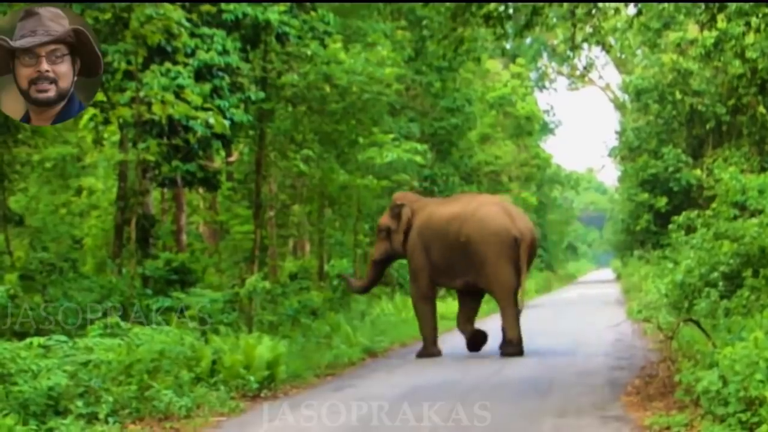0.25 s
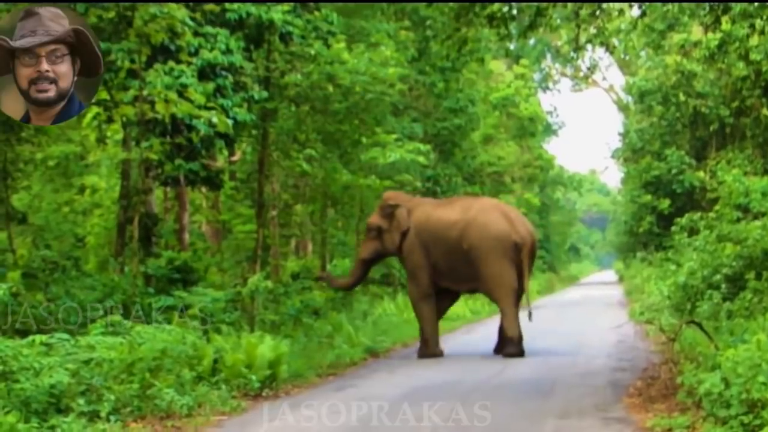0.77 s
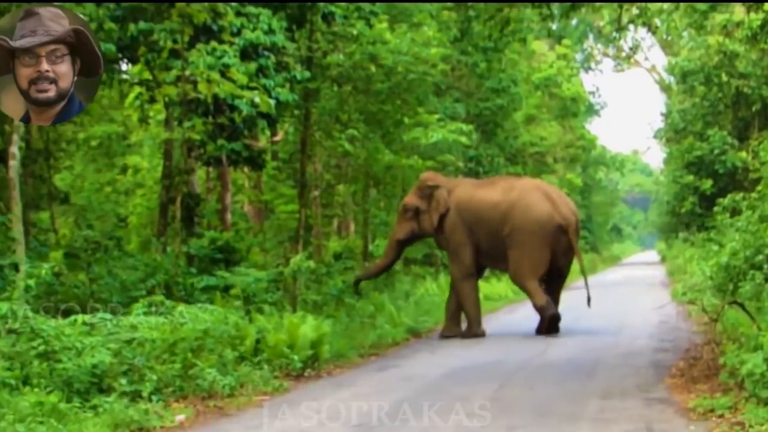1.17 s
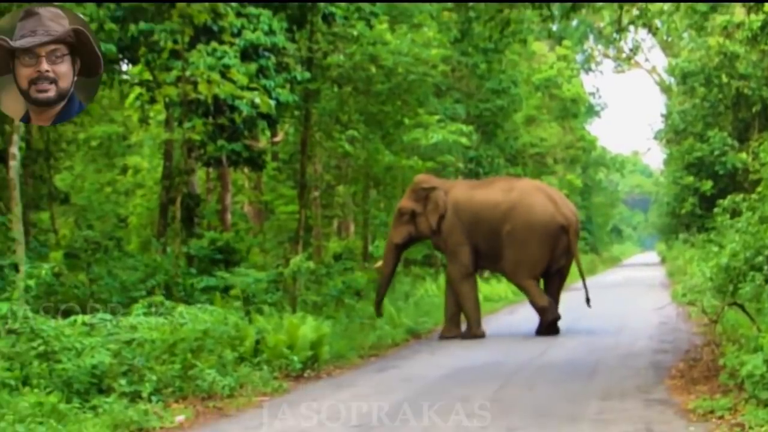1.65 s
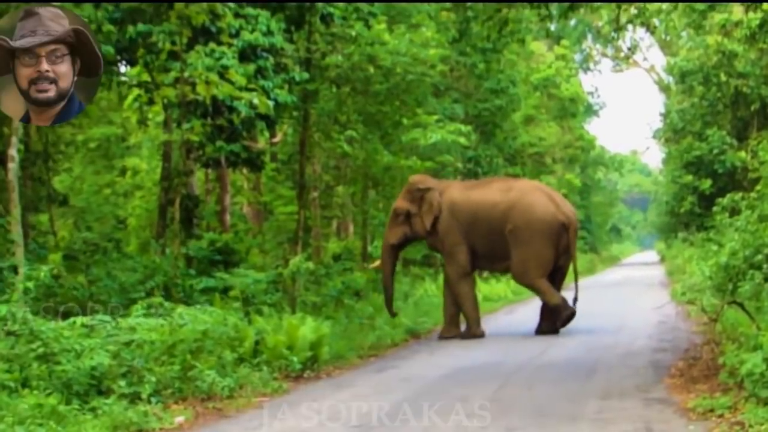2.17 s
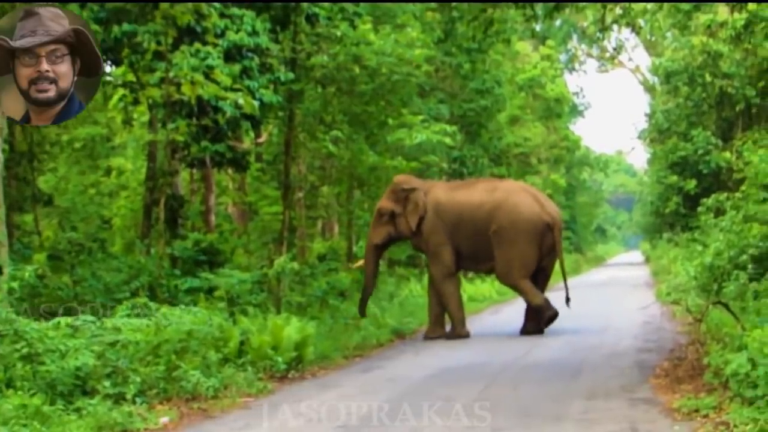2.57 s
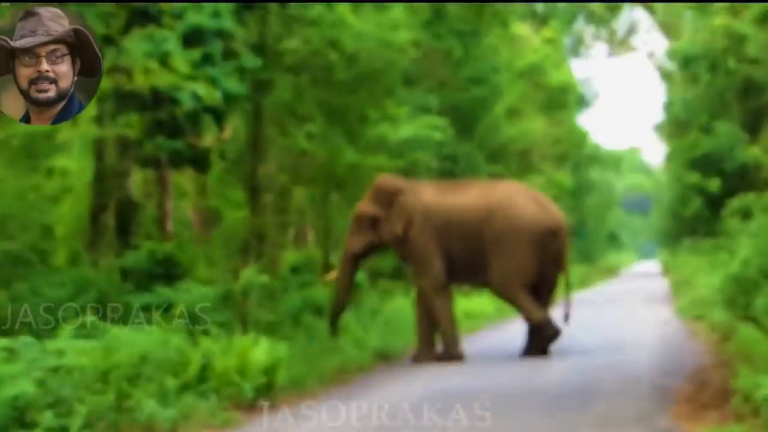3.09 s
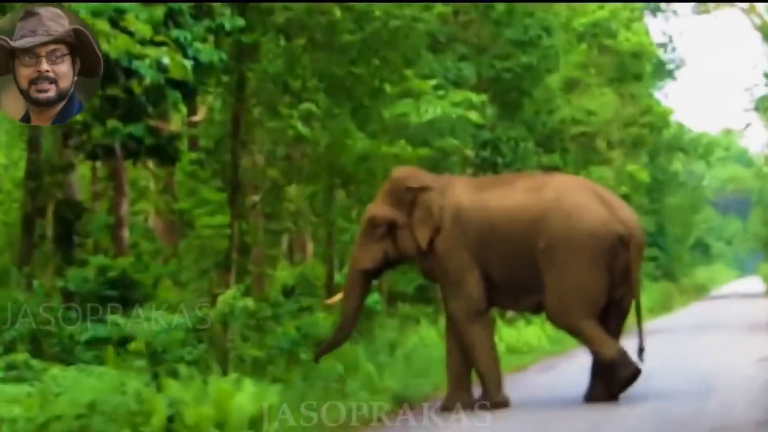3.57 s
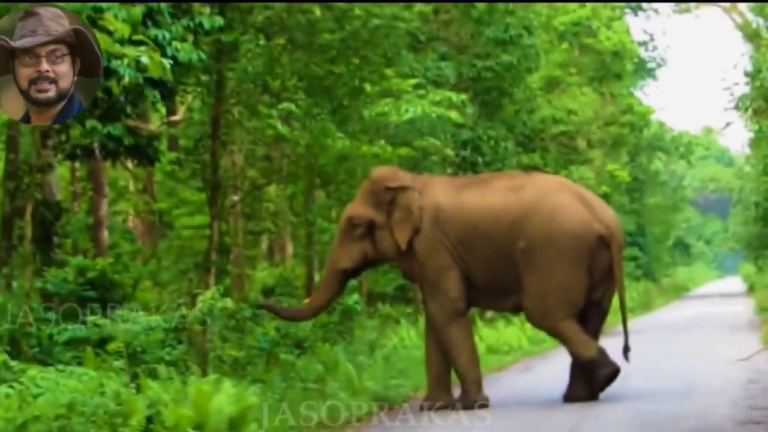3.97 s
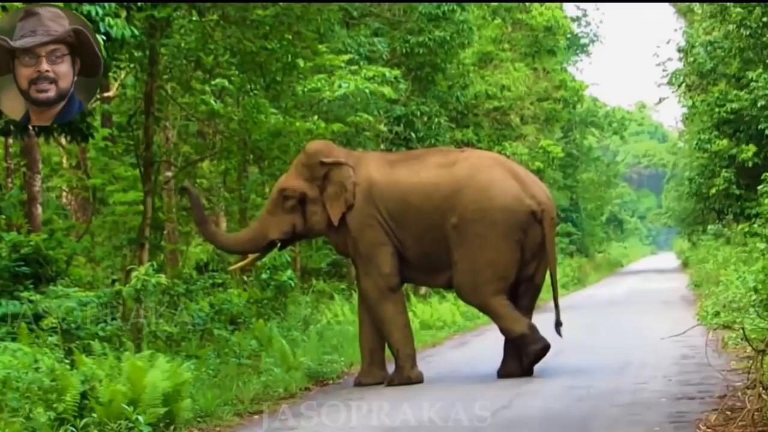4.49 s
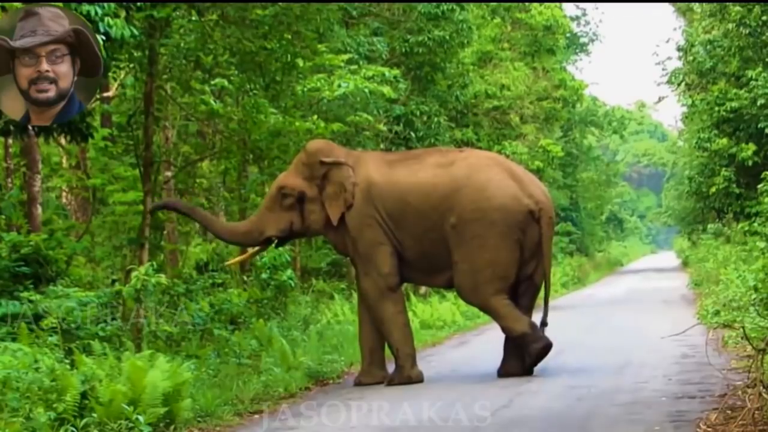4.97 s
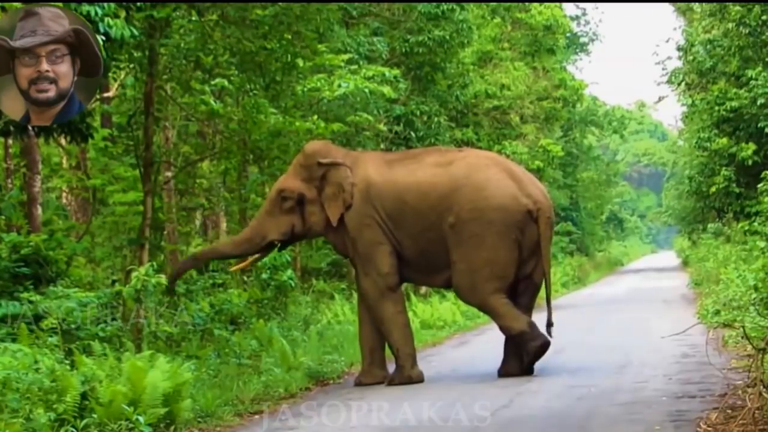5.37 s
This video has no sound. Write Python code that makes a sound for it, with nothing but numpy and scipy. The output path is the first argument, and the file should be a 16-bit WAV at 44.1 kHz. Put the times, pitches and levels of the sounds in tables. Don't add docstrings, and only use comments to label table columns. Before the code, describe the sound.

A daytime forest road in stereo, with low, uneven wind rumble, faint leaf hiss and crisp drops ticking on leaves throughout. Far birds whistle and chatter from the start. At about 0.8 s a near bird gives a rounded, harmonic squeal, rising quickly then falling until about 1.2 s. Small chips from slightly left grow into full falling chips alternating with rough burrs from 1.65 to 2.9 s, over a distant sagging trill at 1.5-2.5 s. Thin high notes flicker above. Clear trembling whistles hold, fall and arch between 3.2 and 3.9 s. Around 4.05 s a brighter squeal overlaps a two-humped whistle, with a flare of far chatter. From about 4.5 s a low engine idle fades in quickly and stays soft. Gusts shake leaves at 4.6 and most strongly at 5.3 s, among low gulps at 4.9-5.1 s and quick twitters. Trees return a short, diffuse echo.

```python
import sys
import numpy as np
from scipy import signal
from scipy.io import wavfile
from scipy.ndimage import uniform_filter1d

SR = 44100
rng = np.random.default_rng(int(sys.argv[2]) if len(sys.argv) > 2 else 0)


def gain_from_decibels(decibels):
    exponent = np.asarray(decibels, float) / 20
    return 10 ** exponent


def wrap_up_sound(samples):
    columns = np.atleast_2d(samples).T
    tamed = np.clip(columns, -1, 1)
    steps = np.round(tamed * 32767).astype(np.int16)
    wavfile.write(sys.argv[1], SR, steps)


N = 248283


def in_time(rows):
    s, *columns = np.transpose(rows)
    return [np.interp(np.arange(N) / SR, s, c) for c in columns]


def at_hz(points, hz):
    table_hz, value = np.array(points)[:, 0], np.array(points)[:, 1]
    return np.interp(np.log(hz), np.log(table_hz), value)


def rms_one(x):
    return x / np.sqrt(np.mean(x ** 2) + 1e-20)


def drift(rate_hz):
    r = np.exp(-80 * np.pi * rate_hz / SR)
    slow = signal.lfilter([1], [1, -2 * r, r * r], rng.standard_normal(N // 40 + 2002))[2000:]
    return np.interp(np.arange(N) / 40, np.arange(len(slow)), rms_one(slow))


def band(x, low_hz, high_hz):
    return signal.sosfilt(signal.butter(2, [low_hz, high_hz], "band", fs=SR, output="sos"), x)


def pan(x, left_db):
    return x * gain_from_decibels(np.array([[left_db / 2], [-left_db / 2]]))


def breaks(rows):
    t = np.arange(N) / SR
    return sum(db * np.exp(-((t - s) / width_s) ** 2) for s, width_s, db in rows)


def flares(rows, floor_db):
    t = np.arange(N) / SR
    peaks = [db - np.where(t < s, rise * (s - t), fall * (t - s)) for s, db, rise, fall in rows]
    return np.max(peaks + [t * 0 + floor_db], axis=0)


def sounding(tables, fade_s):
    on = np.zeros(N)
    for rows in tables:
        on[round(rows[0][0] * SR):round(rows[-1][0] * SR)] = 1
    return uniform_filter1d(on, max(2, round(fade_s * SR)))


def shaped(rows, start, end):
    return [(s, length, start * hz, hz, end * hz, db) for s, length, hz, db in rows]


def straight(rows):
    return [(s, length, first, (first + last) / 2, last, db) for s, length, first, last, db in rows]


def notes(rows, swell, flutter_db, flutter_hz, wobble):
    out, shake = np.zeros(N), 1 + wobble * drift(flutter_hz)
    for s, length, first, middle, last, db in rows:
        u = np.arange(round(length * SR)) / (length * SR)
        at = round(s * SR) + np.arange(len(u))
        hz = first * (1 - u) * (1 - 2 * u) + 4 * middle * u * (1 - u) + last * u * (2 * u - 1)
        tone = np.sin(2 * np.pi * np.cumsum(hz * shake[at]) / SR)
        out[at] += gain_from_decibels(db) * np.sin(np.pi * u) ** swell * tone
    return out * gain_from_decibels(flutter_db * drift(flutter_hz))


def warbles(rows, per_s, sweep_hz, gate, flutter_db, rasp):
    out, shake = np.zeros(N), 1 + rasp * drift(250)
    for s, length, first, last, db in rows:
        t = np.arange(round(length * SR)) / SR
        at = round(s * SR) + np.arange(len(t))
        cycle = (t * per_s * rng.uniform(0.98, 1.08)) % 1
        hz = first + (last - first) * np.sqrt(t / length) + sweep_hz * (cycle - .5)
        shape = np.sin(np.pi * cycle) ** gate * np.sin(np.pi * t / length) ** 0.043
        out[at] += gain_from_decibels(db) * shape * np.sin(2 * np.pi * np.cumsum(hz * shake[at]) / SR)
    return out * gain_from_decibels(flutter_db * drift(32))


def banded_noise(spectrum, patchy_db):
    # hz, correlation
    likeness = [(25, 0.88), (90, 0.97), (180, 0.65), (350, 0.045), (700, 0.25), (1500, 0.55), (4000, 0.65),
                (12000, 0.079)]
    # hz, left_minus_right_db
    balance_db = [(30, -.8), (90, -1), (180, 2.5), (700, 0), (1500, -0.5), (12000, 0)]
    out, together = 0, drift(7.8)
    edges_hz = np.geomspace(18, 16500, 21)
    white = rng.standard_normal((2, 2, N))
    for k, (low, high) in enumerate(zip(edges_hz, edges_hz[1:])):
        hz = np.sqrt(low * high)
        if spectrum[0][0] < hz < spectrum[-1][0]:
            mid, side = band(white[k % 2], low, high)
            alike = np.clip(at_hz(likeness, hz), -1, 1)
            gain = gain_from_decibels(at_hz(spectrum, hz) + patchy_db * (1.02 * together + drift(13.5)))
            pair = np.sqrt(1 + alike) * mid + np.sqrt(1 - alike) * side * [[1], [-1]]
            out = out + pan(gain * pair, at_hz(balance_db, hz))
    return rms_one(out)


def wind():
    # s, rumble_db
    strength = [(0.0, -29), (.99, -28), (1.91, -32), (2.37, -30), (2.96, -33), (4.31, -36), (4.59, -31.5),
                (5.63, -31)]
    # hz, db_per_hz
    rumble = [(12, -38), (20, -3), (41, -0.5), (59, -2), (97, -6.5), (139, -5.5), (211, -15), (269, -11.5),
              (312, -19.5), (500, -26), (650, -27.5), (1100, -120)]
    # hz, db_per_hz
    leaves = [(180, -57), (300, -3), (508, -4.5), (583, -3.5), (695, -1.5), (904, -4.5), (2660, -7),
              (3920, -11), (6000, -13), (7800, -77), (13200, -120)]
    # hz, db_per_hz
    hiss = [(2060, -50), (3500, -10.5), (4010, -20), (4520, 4), (5980, -1), (6480, 6), (8370, -4.5),
            (13300, -4.5), (15500, -9)]
    # s, width_s, change_db
    lull = [(4.48, .1, -2.5)]
    wind_db, = in_time(strength)
    leaves_db = -40 + 0.16 * (wind_db - wind_db.mean())
    air = gain_from_decibels(wind_db) * banded_noise(rumble, patchy_db=1.0)
    air += gain_from_decibels(leaves_db) * banded_noise(leaves, patchy_db=.9)
    return air + gain_from_decibels(-45 + breaks(lull)) * banded_noise(hiss, patchy_db=1.3)


def hums():
    # hz, width_hz, level_db
    drones = [(510, 20, -61), (688, 25, -60.5), (822, 20, -61)]
    out = 0
    for hz, width_hz, db in drones:
        swell = gain_from_decibels(db + 2.5 * drift(1.5))
        out = out + swell * rms_one(band(rng.standard_normal((2, N)), hz - width_hz / 2, hz + width_hz / 2))
    return out


def engine():
    # s, firing_hz, level_db
    idle = [(0, 23.15, -116), (4.3, 23.35, -50.5), (4.58, 24.03, -37.5), (5.1, 23.92, -38.5),
            (5.63, 24, -39.5)]
    # multiple, level_db
    orders = [(1, -11), (2, -0.5), (3, 5), (4, -6), (5, -27), (7, -11)]
    hz, db = in_time(idle)
    phase = 2 * np.pi * np.cumsum(hz * (1 + 0.016 * drift(3.24))) / SR
    return sum(gain_from_decibels(db + order_db + 3.2 * drift(5)) * np.sin(round(k) * phase + k) for k, order_db in orders)


def gusts():
    # peak_s, peak_db, rise_db_per_s, fall_db_per_s
    leaf_gusts = [
        (4.63, -46, 300, 83),
        (4.96, -50.5, 40, 3),
        (5.28, -38, 128, 100),
    ]
    # peak_s, peak_db, rise_db_per_s, fall_db_per_s
    stir = [(4.95, -53, 40, 12), (5.3, -53, 20, 30)]
    still_db = -71
    leaf = rms_one(band(rng.standard_normal((2, N)), 2500, 9900))
    branch = rms_one(band(rng.standard_normal((2, N)), 750, 1200))
    return gain_from_decibels(flares(leaf_gusts, still_db) + 4.1 * drift(60)) * leaf + gain_from_decibels(flares(stir, still_db)) * branch


def drops():
    # s, peak_db
    large = [(0.07, -36), (0.336, -33), (0.414, -31), (0.471, -31), (.5447, -35), (.616, -36), (.7836, -33),
             (1.1034, -35), (1.5524, -36), (1.7335, -35), (2.8674, -33), (3.0121, -37), (3.1004, -36),
             (3.267, -34), (3.3403, -34), (3.3792, -33), (3.86, -36), (3.873, -36), (3.934, -32),
             (4.2682, -34), (4.4862, -37), (4.6279, -33), (4.9067, -36), (5.4949, -33), (5.5772, -35),
             (.6933, -36), (1.0081, -33), (1.1671, -34), (1.307, -37), (1.358, -32), (1.4012, -32),
             (1.4527, -32), (1.568, -34), (1.771, -31), (1.8951, -36), (2.2189, -35), (2.4803, -36),
             (2.5628, -32), (2.6555, -33), (2.722, -36.5), (2.818, -31), (3.121, -32.5), (3.2031, -33),
             (3.2281, -34), (3.52, -35), (3.6022, -39), (3.76, -41), (3.91, -37), (3.9889, -42),
             (4.9814, -37), (5.2465, -37)]
    s, peak_db = np.transpose(large)
    hits = (rng.random(N) < 16 / SR) * gain_from_decibels(-49 + 3.5 * rng.standard_normal(N))
    hits[np.round(s * SR).astype(int)] = gain_from_decibels(peak_db - 4.0)
    puff = signal.lfilter([1], [1, -np.exp(-1 / (.0045 * SR))], hits)
    noise = rng.standard_normal((2, N))
    leaf = signal.lfilter([1], [1, -.2], noise[0] + 0.1 * noise[1] * np.array([[1], [-1]]))
    return puff * rms_one(band(leaf, 3800, 10800))


def chatter():
    # peak_s, peak_db, rise_db_per_s, fall_db_per_s
    flare_ups = [
        (.3, -48.5, 32, 1),
        (.65, -42.5, 56, 33),
        (.85, -46, 27, 22),
        (4.1, -43, 123, 40),
        (4.89, -53, 100, 250),
    ]
    start, pitch, glide, size = rng.random((4, 1800))
    first = 1700 + 1900 * pitch
    last = first * (.8 + 0.404 * glide)
    start_s, length_s = start * (N / SR - .05), .005 + 0.0077 * size
    rows = np.transpose([start_s, length_s, first, (first + last) / 2, last, 5 * size])
    return gain_from_decibels(flares(flare_ups, -68)) * notes(rows, swell=0.4, flutter_db=2.0, flutter_hz=61, wobble=.01)


def far_birds():
    # start_s, length_s, first_hz, last_hz, level_db
    glides = [(0.0, 0.017, 2040, 2170, -37), (.032, 0.15, 2396, 2875, -41.5),
              (.132, 0.037, 1350, 1400, -49), (.15, .055, 2520, 2430, -49), (.18, .035, 2850, 3000, -49),
              (.25, .03, 1780, 1920, -48), (1.26, 0.12, 2900, 2650, -50), (3.182, 0.047, 2090, 1727, -40.5),
              (3.491, 0.025, 2560, 2800, -41), (3.515, .035, 2820, 2650, -43), (3.55, .04, 2540, 2580, -46),
              (3.66, .02, 2050, 2150, -47), (3.693, .017, 1780, 1640, -45), (3.902, 0.087, 2093, 1730, -45),
              (4.555, 0.04, 2420, 2330, -40), (4.5, .09, 3150, 2900, -51), (4.595, .0274, 2640, 1765, -37),
              (4.027, .022, 2250, 2620, -40), (4.17, .08, 1800, 1880, -46), (4.29, .065, 1650, 1470, -47),
              (4.385, .11, 2150, 1940, -46), (.635, .012, 2050, 2150, -44), (5.226, .044, 2636, 2624, -36),
              (5.542, .085, 2613, 2560, -50.5)]
    # start_s, length_s, pitch_hz, level_db
    gulps = [
        (4.909, .026, 1150, -42),
        (4.98, .028, 1100, -41),
        (5.058, .022, 1060, -40.5),
    ]
    # start_s, length_s, pitch_hz, level_db
    trills = [(1.489, 0.053, 1960, -41.5), (1.616, 0.072, 1906, -43), (1.793, .077, 1960, -39.5),
              (1.946, 0.094, 1925, -40.5), (2.128, .154, 1876, -40), (2.326, .15, 1850, -37)]
    sag_hz_per_s = 410
    far = notes(straight(glides) + shaped(gulps, 1.12, 0.78),
                swell=0.057, flutter_db=1.0, flutter_hz=45, wobble=0.0031) * gain_from_decibels(4.5)
    sagging = [(s, length, hz, hz - sag_hz_per_s * length, db) for s, length, hz, db in trills]
    far += warbles(sagging, per_s=47, sweep_hz=90, gate=0.43, flutter_db=3.0, rasp=0.014) * gain_from_decibels(2)
    return far + chatter()


def thin_notes():
    # start_s, length_s, pitch_hz, level_db
    high = [(.3, 0.032, 6400, -49), (.63, 0.078, 7330, -48.5), (.787, .07, 8100, -50),
            (.93, 0.13, 7160, -50), (1.11, 0.069, 8030, -47.5), (1.765, 0.066, 8180, -48.5),
            (2.055, .14, 6990, -43), (2.24, 0.061, 7660, -48), (2.83, 0.048, 6860, -50),
            (3.27, 0.054, 7650, -47.5), (3.42, 0.073, 7350, -51), (3.58, 0.058, 7180, -49),
            (3.74, 0.19, 7370, -48), (4.33, 0.12, 7750, -50)]
    return notes(shaped(high, 1.008, .995), swell=.2, flutter_db=4, flutter_hz=160, wobble=.011) * gain_from_decibels(3.5)


def twitter():
    # start_s, length_s, first_hz, last_hz, level_db
    quick = [(.067, 0.02, 4660, 4330, -56), (.378, .013, 4450, 4230, -59), (.356, .008, 3150, 3000, -58),
             (1.187, 0.011, 4800, 4250, -59), (1.524, 0.012, 5000, 4080, -60),
             (4.742, 0.018, 2030, 1630, -59), (4.71, .012, 1900, 1700, -60), (4.64, .012, 2000, 2050, -60),
             (4.772, .015, 2330, 1730, -59), (4.862, 0.012, 3100, 3330, -60),
             (4.892, 0.015, 3120, 3570, -54), (5.069, 0.0049, 2260, 1280, -48),
             (5.066, .005, 3300, 2300, -56), (4.87, .03, 2900, 3400, -60), (5.08, 0.011, 2660, 2600, -53),
             (5.192, .024, 4430, 4420, -56), (5.211, 0.0092, 3550, 3100, -54),
             (5.249, 0.0096, 4950, 4500, -39), (5.268, .016, 3420, 3020, -51),
             (5.306, 0.0078, 4400, 5200, -46.5), (5.312, 0.014, 5060, 4330, -49),
             (5.326, 0.013, 3530, 3270, -52.5)]
    # start_s, pitch_hz, level_db
    pips = [(4.618, 3800, -54), (4.666, 3600, -52), (4.711, 3300, -52), (4.758, 2950, -53)]
    rising = shaped([(s, 0.012, hz, db) for s, hz, db in pips], 0.82, 1.1)
    return notes(straight(quick) + rising, swell=0.31, flutter_db=2.5, flutter_hz=90, wobble=0.0087) * gain_from_decibels(15.5)


def whistles():
    # s, pitch_hz, level_db
    calls = [
        [(1.385, 2620, -50), (1.41, 2560, -41), (1.45, 2470, -39), (1.49, 2380, -42)],
        [(3.243, 1900, -43), (3.262, 2188, -29.5), (3.404, 2200, -31), (3.45, 2154, -65)],
        [(3.49, 2220, -39), (3.524, 2196, -26.5), (3.585, 1870, -28), (3.615, 1733, -33.5)],
        [(3.69, 2220, -36), (3.712, 2363, -27.5), (3.78, 2280, -25.5), (3.86, 2076, -28), (3.875, 1880, -36)],
        [(4.035, 1525, -42), (4.13, 1796, -28), (4.2, 2025, -36.5), (4.245, 2014, -34), (4.275, 1770, -26),
         (4.31, 1700, -31), (4.34, 1600, -36)],
        [(4.833, 2270, -42), (4.862, 2010, -36), (4.905, 1960, -35), (4.918, 1890, -34), (4.96, 1790, -36),
         (4.978, 1740, -46)],
    ]
    # first_s, spacing_s, count, depth_db
    stutters = [(3.347, 0.0348, 2, -12.5), (3.504, .013, 4, -11.5), (3.57, 0.018, 1, -8),
                (4.122, .008, 1, -13.5), (4.165, .016, 5, -3), (4.91, .02, 1, -6)]
    hz, db = in_time(np.concatenate(calls))
    catch = breaks([(s + k * gap_s, 0.2 * gap_s, depth_db)
                    for s, gap_s, count, depth_db in stutters for k in range(round(count))])
    hz = uniform_filter1d(hz, round(.014 * SR))
    hz = hz * (1 + 0.0079 * catch + 0.0028 * drift(54))
    level = np.sqrt(2) * gain_from_decibels(db + catch + 2.1 * drift(72))
    return level * np.sin(2 * np.pi * np.cumsum(hz) / SR) * sounding(calls, 0.0099)


def burrs():
    # start_s, level_db
    starts = [(1.649, -34.5), (1.939, -34), (2.235, -34.5), (2.533, -35.5), (2.853, -36.5)]
    # delay_s, length_s, first_hz, middle_hz, last_hz, change_db
    strokes = [
        (0, .004, 2950, 3200, 3400, 1.5),
        (.004, .013, 3400, 3050, 2500, .3),
        (.02, .015, 2900, 2550, 2350, .3),
        (.035, .015, 2650, 2400, 2250, -1.5),
    ]
    slip_s = .0015
    rows = [(s + lag + slip_s * rng.normal() * (lag > .01), length, first, middle, last,
             db + change + rng.normal())
            for s, db in starts for lag, length, first, middle, last, change in strokes]
    return notes(rows, swell=.4, flutter_db=2.5, flutter_hz=250, wobble=.022)


def chips():
    # start_s, pitch_hz, level_db
    full_chips = [(1.805, 3070, -29.5), (2.095, 2970, -30), (2.391, 3080, -29.5), (2.687, 3034, -29.5)]
    # start_s, length_s, pitch_hz, level_db
    warm_up = [(.628, 0.041, 3250, -44.5), (.931, 0.028, 3270, -39), (1.15, .018, 3400, -46),
               (1.163, .026, 3200, -37.5), (1.32, .028, 3300, -41), (1.342, 0.026, 3050, -37),
               (1.526, .016, 3150, -44), (1.537, 0.021, 3130, -37.5), (1.56, .016, 3200, -44)]
    full = shaped([(s, .054, hz, db) for s, hz, db in full_chips], 1.42, .85)
    out = notes(shaped(warm_up, 1.03, .9) + full, swell=.9, flutter_db=2, flutter_hz=80, wobble=.003)
    out = band(band(out, 2300, 3550), 2600, 4300)
    out *= gain_from_decibels(9 + breaks([(s + .035, 0.0046, -8.5) for s, hz, db in full_chips]))
    return out + burrs() * gain_from_decibels(7.0)


def squeal():
    # s, pitch_hz, second_partial_db, brightness_db_per_partial_above_3rd
    calls = [
        [(.772, 1207, -19, -1), (.806, 1477, -16, -1), (.83, 1575, -14.5, -1.5), (.885, 1557, -14, -1.5),
         (.985, 1295, -24.5, -.6), (1.002, 1260, -14.5, -4), (1.104, 1185, -20.5, -3), (1.142, 1086, -29, -.6),
         (1.37, 885, -51, -.6)],
        [(4.055, 1240, -21, .6), (4.1, 1598, -15, -.6), (4.14, 1632, -11.5, .3), (4.204, 1548, -17.5, .6),
         (4.285, 1300, -24.5, 2.5), (4.298, 1288, -16.5, .3), (4.433, 1178, -23, -1.5), (4.472, 1073, -37, -.6),
         (4.6, 975, -45, -.6)],
    ]
    upper = [(1, -20.5, -0.82), (3, -11.5, -0.5), (4, -21.5, 0.8), (5, -29, 1.5), (6, -28.5, 0.5),
             (7, -38, 2.5), (8, -34, 4.5), (9, -40, 3)]
    # hz, db
    throat = [(1000, -5), (1500, -0.5), (1640, -3.5), (3600, -25), (4400, -4.5), (4900, -10), (5250, 6),
              (5550, -32), (5950, -8), (6300, 8.5), (7000, -10), (8300, -12.5), (9400, 5), (14500, -7)]
    # s, width_s, change_db
    voice_breaks = [(.789, .001, -15), (.845, .007, 1), (.923, 0.0044, -4), (.948, .008, 3.5),
                    (.978, .013, -4), (1.23, .04, 4), (1.003, .012, 1.5), (4.062, 0.0045, 6.5),
                    (4.073, .004, -15), (4.143, .012, -2.5), (4.34, 0.027, 1.5), (4.525, .025, 3.5)]
    # multiple, s, width_s, change_db
    falters = [(1, .803, .006, -12), (1, .93, .014, -11), (1, 1.17, .04, -3), (1, 1.37, .11, -14),
               (1, 4.085, .006, -6), (1, 4.155, .035, -7), (1, 4.228, .012, -18), (1, 4.207, .01, 5),
               (1, 4.59, .03, -3), (1, 1.25, .05, -4), (1, 4.3, .025, 3), (1, 4.52, .04, -4),
               (3, 4.122, .008, -9), (3, 4.145, .01, -13), (3, 4.19, .02, 3), (3, 4.312, .006, -9),
               (4, 4.088, .01, -12), (4, .8, .012, -10), (4, .86, .05, 2.5), (8, .86, .08, -12),
               (9, .86, .08, -12), (5, 4.066, .006, 6)]
    hz, second_db, bright_db = in_time(np.concatenate(calls))
    hz = uniform_filter1d(hz, round(.02 * SR))
    effort_db = second_db + 14
    second_db = second_db + breaks(voice_breaks) + .7 * drift(70)
    rasp_s, rasp_db = .03, 1.5
    onset = breaks([(rows[0][0] + rasp_s, rasp_s, 1) for rows in calls])
    second_db = second_db + rasp_db * onset * drift(210)
    phase = 2 * np.pi * np.cumsum(hz * (1 + 0.001 * drift(62))) / SR
    out = gain_from_decibels(second_db) * np.sin(2 * phase)
    for multiple, db, growth in upper:
        k = round(multiple)
        colour_db = at_hz(throat, k * hz) + 1.2 * drift(25) + bright_db * max(k - 3, 0)
        colour_db = colour_db + breaks([row[1:] for row in falters if round(row[0]) == k])
        out += gain_from_decibels(second_db + growth * effort_db + db + colour_db) * np.sin(k * phase)
    air = rms_one(band(rng.standard_normal(N), 2150, 2730))
    breath = gain_from_decibels(second_db - 38 - .5 * effort_db) * air
    scratch = gain_from_decibels(-33) * breaks([(rows[0][0] - .016, .018, 1) for rows in calls]) * air
    return (np.sqrt(2) * out + breath) * sounding(calls, 0.0074) + scratch


def trees(x, t60_s):
    t = np.arange(SR // 2) / SR
    clumps = gain_from_decibels(2.5 * drift(40)[:len(t)])
    tail = rng.standard_normal((2, len(t))) * clumps * gain_from_decibels(-60 * t / t60_s) * (1 - np.exp(-t / 0.0025))
    tail = (tail + 0.54 * tail[::-1]) / np.sqrt(np.sum(tail ** 2))
    return signal.fftconvolve(x[None], tail, axes=1)[:, :N]


def scene():
    near, song, left_bird = squeal(), whistles(), chips()
    far, quick, thin = far_birds(), twitter(), thin_notes()
    lead = 0.31 * np.gradient(near + song) * [[1], [-1]]
    birds = lead + pan(near, -0.15) + pan(song, 0.72) + pan(left_bird, 4.5)
    birds = birds + pan(far, .3) + pan(quick, 1.1) + pan(thin, .3)
    sent = gain_from_decibels(-16) * near + gain_from_decibels(-13.5) * song + gain_from_decibels(-2) * left_bird
    sent = sent + gain_from_decibels(-2.5) * (far + thin) + gain_from_decibels(-8) * quick
    return birds + trees(sent, t60_s=.5) + wind() + gusts() + drops() + engine() + hums()


def band_limit(x):
    return signal.sosfilt(signal.butter(12, 15760, fs=SR, output="sos"), x)


def record(dry):
    no_bass = signal.sosfilt(signal.butter(2, 30, "high", fs=SR, output="sos"), dry)
    mix = signal.sosfilt(signal.cheby2(16, 52, 15800, fs=SR, output="sos"), no_bass)
    return band_limit(mix)


dry = scene()
out = record(dry)
wrap_up_sound(out)
```